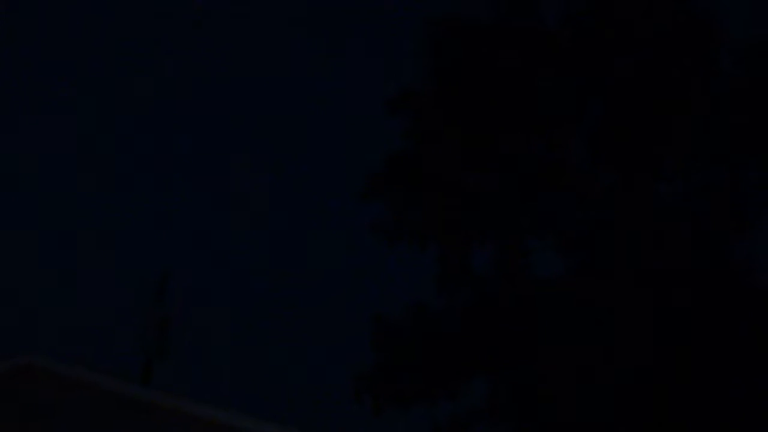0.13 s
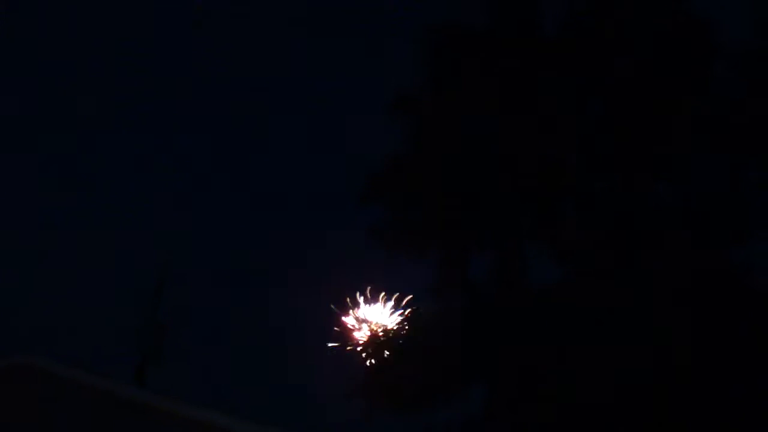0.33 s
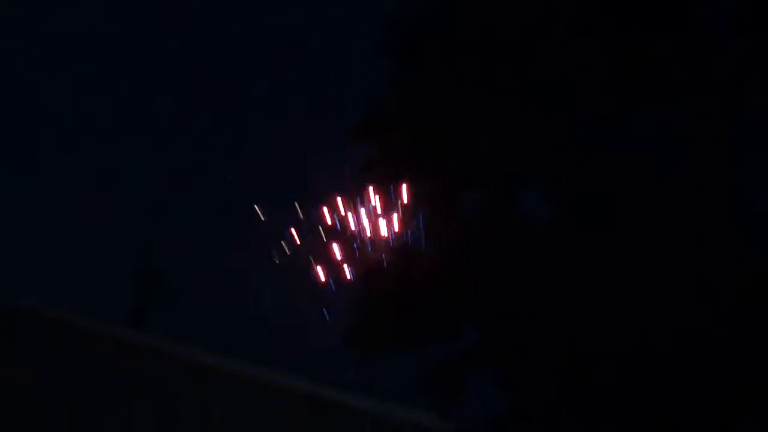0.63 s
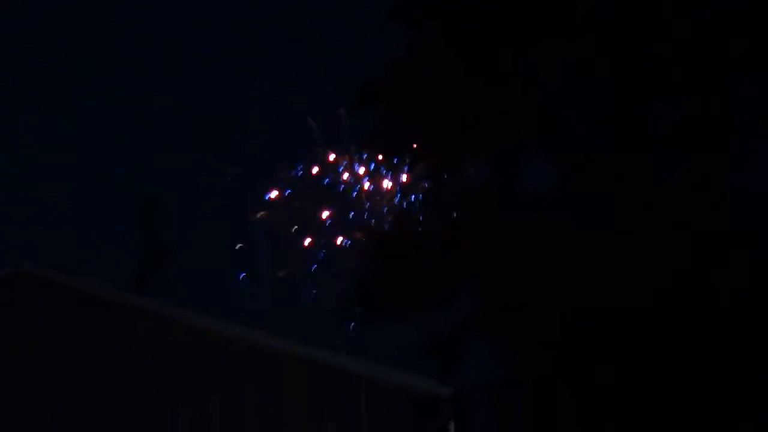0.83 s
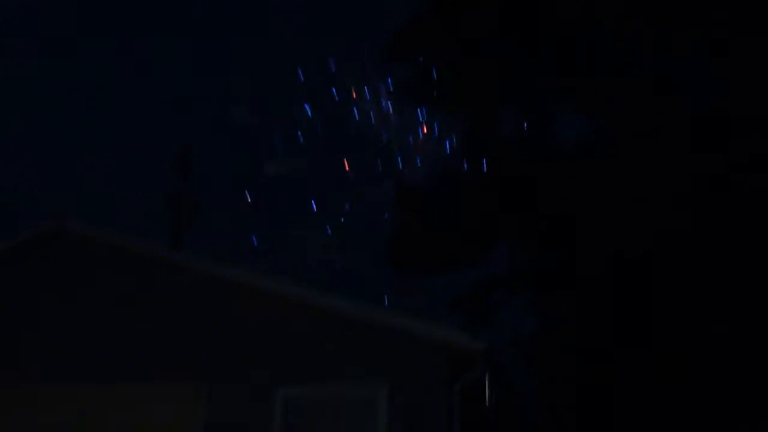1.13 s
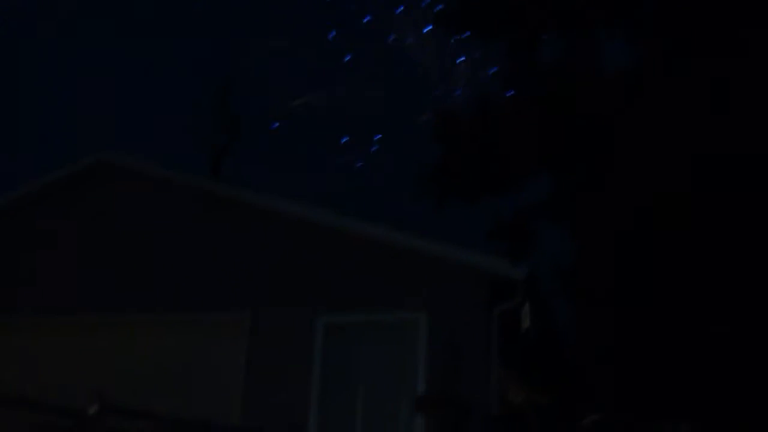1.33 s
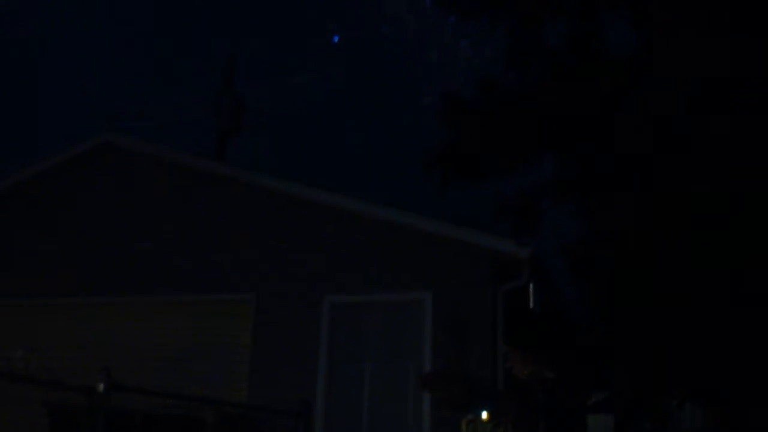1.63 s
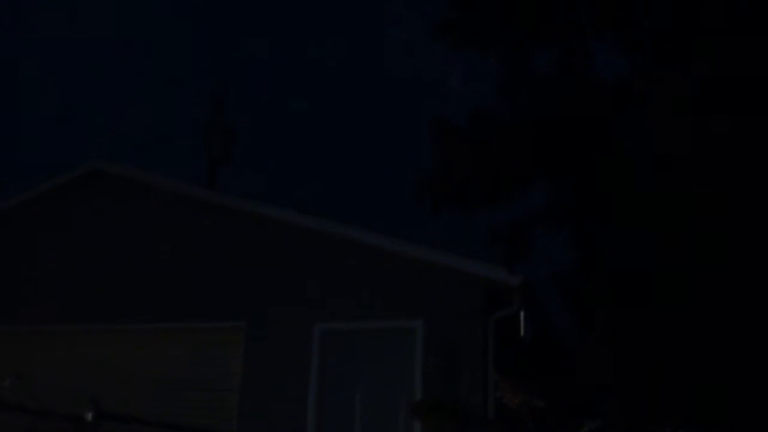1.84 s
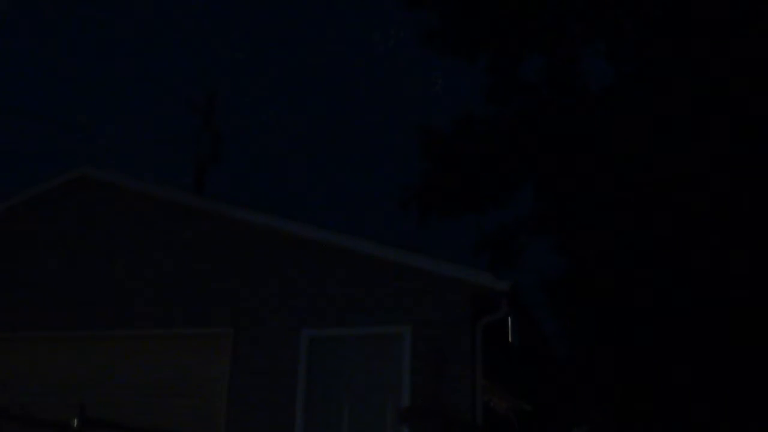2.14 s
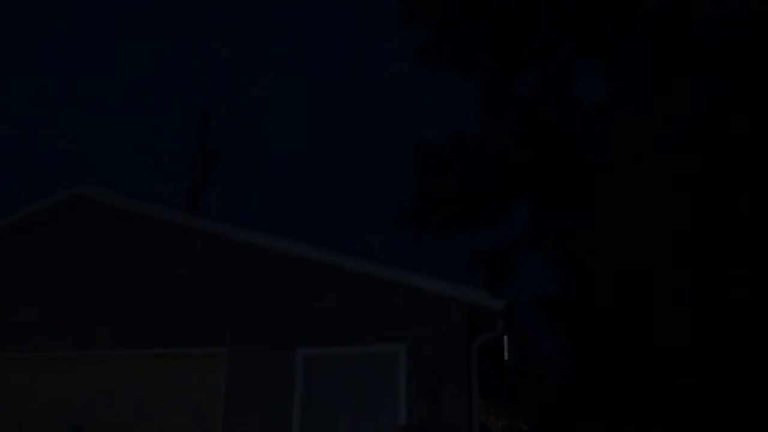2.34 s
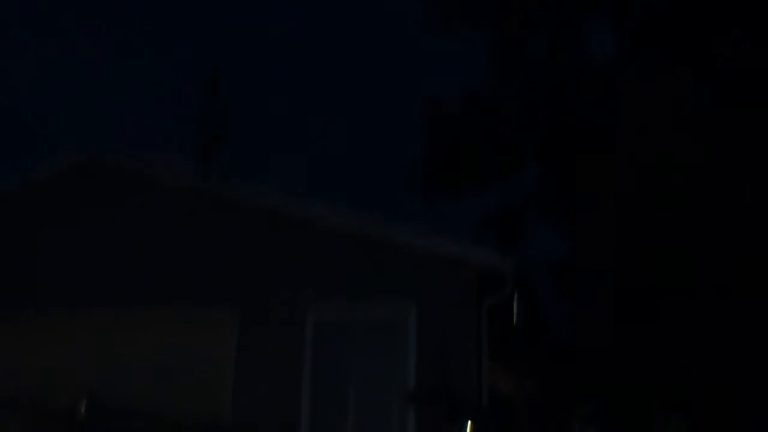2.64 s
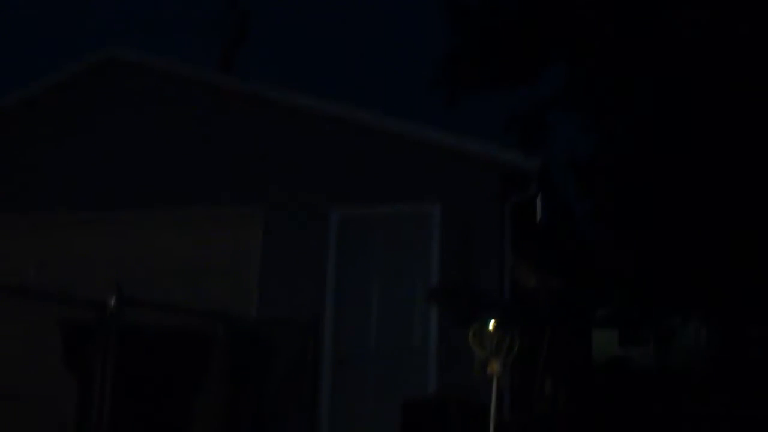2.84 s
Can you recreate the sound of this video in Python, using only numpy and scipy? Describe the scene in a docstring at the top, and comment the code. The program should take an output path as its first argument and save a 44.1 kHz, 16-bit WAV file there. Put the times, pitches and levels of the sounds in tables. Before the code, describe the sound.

Outdoors among houses at night, a steady compressor hum and fan rush comes first, then a single sharp firework bang clips the handheld microphone, and its echoes swell, decay and end in faint, far-off thuds.

```python
"""Night street: a compressor, probably an air conditioner, hums and whirs steadily close by, tones over fan noise.
At 0.76 s a firework shell bursts overhead: one sharp crack of pressure jumps, overloading the microphone.
Sharp slaps off the nearest houses follow, within a wash of echoes from houses and trees: decaying noise
that swells and rolls away. Last come a few dull returns from far off, short bands of noise."""
import sys
import numpy as np
from scipy import signal
from scipy.fft import rfft, irfft, next_fast_len
from scipy.io import wavfile
from scipy.ndimage import map_coordinates

SR = 44100
rng = np.random.default_rng(int(sys.argv[2]) if len(sys.argv) > 2 else 0)


def int16_out(signal):
    """Quantize to a 16-bit WAV file."""
    q = np.round(np.clip(np.atleast_2d(signal).T, -1, 1) * 32767)
    wavfile.write(sys.argv[1], SR, q.astype(np.int16))


N = 130977

# The shock and its first reflections off ground and wall, before the crack's colour:
# [delay t/s, level/dB, rise time constant t/s, length of the push t/s]
SHOCKS = [(0, -2, 0.000047, 0.00042), (.0005, 11, 0.000046, 0.0004), (.0024, 5.5, 0.0003, 0.00075),
          (.0037, 1.5, 0.00011, 0.00099)]
# Colour of the crack and the slaps: [f/Hz, level/dB]
CRACK_COLOUR = [(40, -32), (120, -13), (280, 4), (550, -7.5), (1100, -1.5), (1700, -6), (2500, 1),
                (3600, -2.5), (4900, 3), (6000, 2), (7300, 2), (10500, -8)]
# Sharp returns from nearby houses, before the same colour; a longer rise is duller:
# [t/s, level/dB, rise time constant t/s]
HOUSE_SLAPS = [(0.801, -17, 0.000065), (.8495, -17, 0.00021), (.861, -1, .0003), (0.873, -13, .0001),
               (0.895, -10, 0.00011), (1.016, -20, 0.00022)]
# Relative colour of the wash of echoes: [f/Hz, level/dB]
WASH_COLOUR = [(30, -47), (70, -18), (130, -14), (200, 0), (350, 3), (500, -10), (760, -0.5), (1150, -9),
               (2000, -7.5), (3500, -12), (5500, -20.5), (8000, -25), (11000, -35.5)]
# Reverberation time, the time to fall 60 dB: [f/Hz, t/s]
WASH_T60 = [(100, 4.4), (300, 3.55), (800, 3.2), (2500, 2.78), (5000, 2.5), (10000, 1.3)]
# Time constant of the wash's build-up: [f/Hz, t/s]
WASH_RISE = [(200, 0.013), (800, .02), (2500, 0.038), (9000, 0.038)]
# Dull returns from house fronts and, later, from far buildings or perhaps other distant shells:
# [t/s, level/dB, fade time constant t/s, centre f/Hz]
THUMPS = [(0.785, -22.5, 0.004, 266), (0.819, -20, 0.0071, 246), (0.922, -19, 0.0053, 286),
          (0.973, -22, .008, 273), (1.047, -19, 0.014, 314), (1.118, -20.5, 0.0073, 278),
          (1.151, -24, .015, 317), (1.524, -25.5, 0.033, 320), (1.551, -18.5, 0.01, 355),
          (1.76, -30, 0.091, 770), (2.358, -22, 0.02, 357), (2.38, -32, 0.018, 282),
          (2.727, -21.5, .012, 454), (2.752, -21.5, 0.018, 414), (2.826, -24.5, 0.017, 343)]
# Compressor tones: [multiple of the shaft rate, rms level/dB before the microphone turns, rms level/dB after]
SHAFT_TONES = [(4, -48, -47), (9, -49, -45), (10, -46, -43), (11, -44, -47), (13, -49, -45), (15, -49, -50),
               (18, -39.5, -43), (19, -46, -48), (21, -46, -47), (22, -32, -36), (23, -51, -45),
               (24, -42, -39.5), (28, -50, -49), (40, -57, -53), (48, -57, -54), (49, -62, -49),
               (56, -54, -59), (71, -59, -70), (72, -63, -63), (85, -72, -63), (86, -62, -64),
               (88, -66, -65), (157, -65, -66)]
# Relative colour of the rush of air: [f/Hz, level/dB]
AIR_COLOUR = [(25, -54), (38, -49), (50, -16.5), (70, -26), (105, -12), (150, -12.5), (215, -0.5),
              (420, -1), (580, 2.5), (760, 0), (950, -3.5), (1800, -5.5), (2800, -11), (4000, -19),
              (6500, -27), (11000, -31.5)]

BURST_S = 0.7642
BARK_HZ, BARK_WIDTH_HZ, BARK_GAIN = 770, 170, 1.9
WASH_DB, WASH_DELAY_S = -17.5, 0.0037  # strength; path to the nearest wall
WALLS_PER_S, WALL_SHARE = 900, 0.22  # single reflections within the wash; their share of its power
SURGE_S, SURGE_WIDTH_S, SURGE_DB = 0.86, 0.011, 1.5  # a crest where many returns arrive together
THUMP_BELOW_DB, THUMP_ABOVE_DB = -14, -17  # per half squared octave below centre; per octave above
SHAFT_HZ = 58.93
AIR_DB, AIR_THROB = -28.5, 0.094  # rms level; depth of the pulsing
TURN_S, TURN_LENGTH_S = 0.7, 0.45  # the microphone turns
START_S, OPENING_S = 0.055, 0.005
OVERLOAD_LEVEL, TOP_HZ = 0.72, 11100


def amp(db):
    """Amplitude factor of a level in dB."""
    return 10 ** (np.asarray(db) / 20)


def unit(x):
    """x at rms 1."""
    return x / np.sqrt(np.mean(x ** 2) + 1e-20)


def along(points, hz):
    """Interpolate (f/Hz, value) points on a log frequency axis."""
    f, value = np.transpose(points)
    return np.interp(np.log(hz + 1), np.log(f + 1), value)


def clock():
    """Time of every sample, in seconds."""
    return np.arange(N) / SR


def wobble(rate_hz):
    """A smooth random curve with rate_hz knots a second."""
    knots = rng.standard_normal(int(N * rate_hz / SR) + 4)
    return map_coordinates(knots, [clock() * rate_hz])


def filtered(x, response):
    """x times a response of frequency, with room so that the tail does not wrap round."""
    size = next_fast_len(N + SR // 2)
    hz = np.fft.rfftfreq(size, 1 / SR)
    return irfft(rfft(x, size) * response(hz), size)[:N]


def coloured(x, colour):
    """x shaped by a colour table, at rms 1."""
    return unit(filtered(x, lambda hz: amp(along(colour, hz))))


def causal(x, colour, size=4096):
    """x through a minimum-phase filter of the given colour, so that nothing sounds ahead of a sharp onset."""
    gain = amp(along(colour, np.fft.rfftfreq(size, 1 / SR)))
    cepstrum = irfft(np.log(gain))
    # fold the cepstrum onto positive time
    cepstrum[1:size // 2] *= 2
    cepstrum[size // 2 + 1:] = 0
    impulse = irfft(np.exp(rfft(cepstrum)))
    return signal.fftconvolve(x, impulse)[:N]


def shock(start_s, rise_s, push_s):
    """A pressure jump that falls through zero into a weak suction."""
    age = np.maximum(clock() - start_s, 0)
    rise = 1 - np.exp(-age / rise_s)
    return rise * (1 - age / push_s) * np.exp(-age / push_s)


def bang(slap_push_s=0.0012):
    """The burst's shocks, a resonance that barks hollow in the low middle, and slaps off the nearest houses."""
    direct = sum(amp(db) * shock(BURST_S + delay, rise, push) for delay, db, rise, push in SHOCKS)

    def resonance(hz):
        damping = 1j * hz * BARK_WIDTH_HZ
        return damping / (BARK_HZ ** 2 - hz ** 2 + damping)

    bark = filtered(direct, resonance)
    slaps = sum(amp(db) * shock(s, rise, slap_push_s) for s, db, rise in HOUSE_SLAPS)
    return causal(direct + BARK_GAIN * bark + slaps, CRACK_COLOUR)


def wash(swell_db=1.0):
    """Countless reflections, as noise and random impulses, build up, crest and die away, the treble first."""
    walls = unit((rng.random(N) < WALLS_PER_S / SR) * rng.standard_normal(N))
    diffuse = rng.standard_normal(N)
    scatter = coloured(np.sqrt(WALL_SHARE) * walls + np.sqrt(1 - WALL_SHARE) * diffuse, WASH_COLOUR)

    # rise and decay separately in each frequency band
    hz, t, bands = signal.stft(scatter, SR, nperseg=256)
    hz = hz[:, None]
    age = np.maximum(t - BURST_S - WASH_DELAY_S, 0)
    build_up = 1 - np.exp(-age / along(WASH_RISE, hz))
    decay = np.exp(-np.log(1000) * age / along(WASH_T60, hz))
    echoes = signal.istft(bands * build_up * decay, SR, nperseg=256)[1][:N]

    surge_db = SURGE_DB * np.exp(-((clock() - SURGE_S) / SURGE_WIDTH_S) ** 2)
    return amp(WASH_DB + surge_db + swell_db * wobble(29.87)) * echoes


def thumps(rise_s=0.002):
    """Dull returns: brief noise smeared into a band that falls away on both sides of its centre."""
    out = np.zeros(N)
    for s, db, fade_s, centre_hz in THUMPS:
        age = np.maximum(clock() - s, 0)
        envelope = np.minimum(age / rise_s, 1) * np.exp(-np.maximum(age - rise_s, 0) / fade_s)

        def band(hz):
            octaves = np.log2((hz + 1) / centre_hz)
            below_db = THUMP_BELOW_DB * octaves ** 2 / 2
            return amp(np.where(octaves < 0, below_db, THUMP_ABOVE_DB * octaves))

        thump = filtered(envelope * rng.standard_normal(N), band)
        # give the filtered noise the energy of its envelope
        out += amp(db) * thump * np.linalg.norm(envelope) / np.linalg.norm(thump)
    return out


def compressor(drift_hz=0.038, phase_waver=0.6, waver_db=1.0):
    """Wavering shaft harmonics, rebalanced as the microphone turns, over air throbbing at twice the shaft rate."""
    shaft_angle = 2 * np.pi * np.cumsum(SHAFT_HZ + drift_hz * wobble(3.115)) / SR
    turned = np.clip((clock() - TURN_S) / TURN_LENGTH_S, 0, 1)
    hum = np.zeros(N)
    for order, before_db, after_db in SHAFT_TONES:
        phase = rng.uniform(0, 2 * np.pi) + phase_waver * wobble(5.59)  # radians
        level_db = before_db + turned * (after_db - before_db) + waver_db * wobble(5.11)
        hum += np.sqrt(2) * amp(level_db) * np.sin(order * shaft_angle + phase)
    throb = 1 + AIR_THROB * np.sin(2 * shaft_angle)
    air = coloured(rng.standard_normal(N), AIR_COLOUR) * throb
    return hum + amp(AIR_DB) * air


def scene():
    """The firework and its echoes over the steady machine nearby."""
    return (bang() + wash() + thumps() + compressor())[None]


def record(dry, hardness=8):
    """The microphone opens just after the start, overloads on loud peaks and keeps nothing above its band limit."""
    x = dry[0] * np.clip((clock() - START_S) / OPENING_S, 0, 1)
    x = x / (1 + np.abs(x / OVERLOAD_LEVEL) ** hardness) ** (1 / hardness)
    return filtered(x, lambda hz: hz < TOP_HZ)[None]


dry = scene()
out = record(dry)
int16_out(out)
```